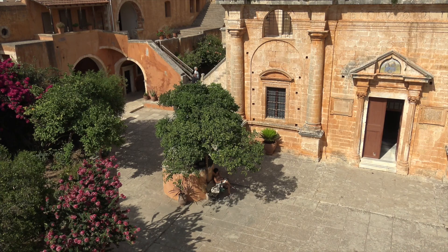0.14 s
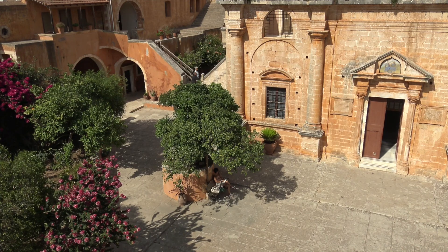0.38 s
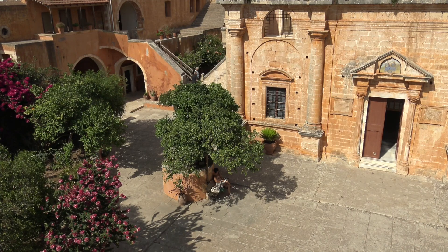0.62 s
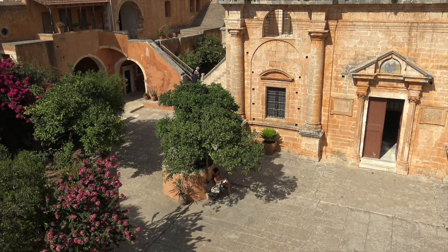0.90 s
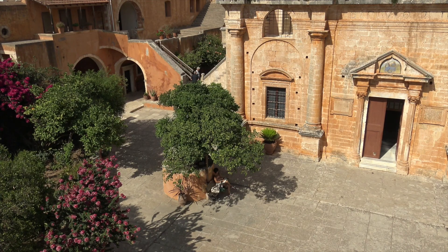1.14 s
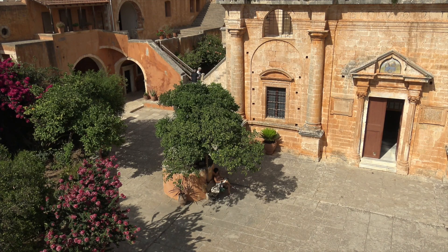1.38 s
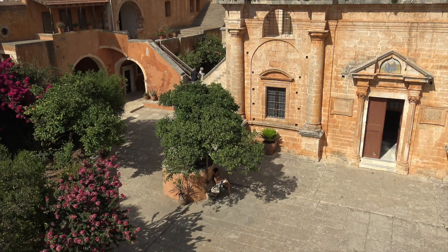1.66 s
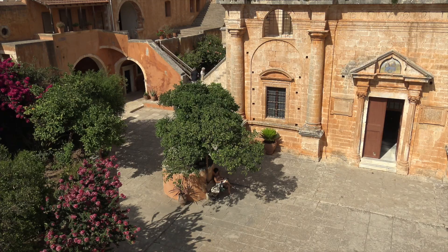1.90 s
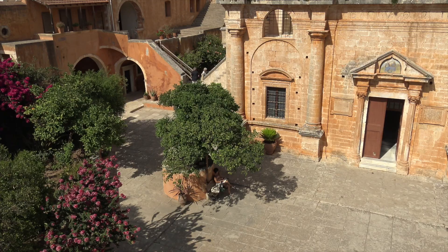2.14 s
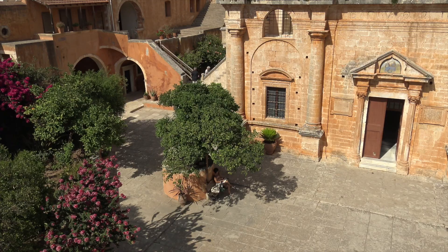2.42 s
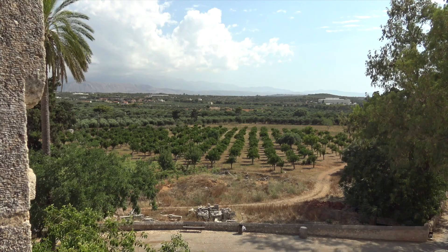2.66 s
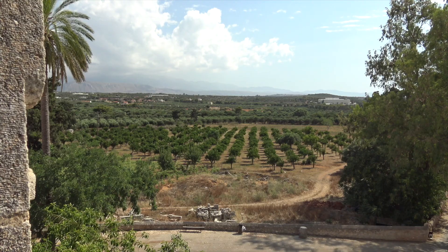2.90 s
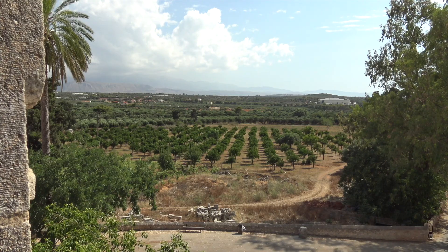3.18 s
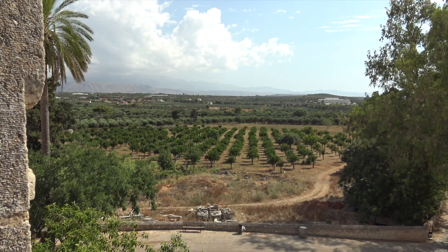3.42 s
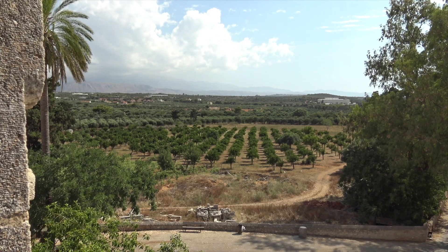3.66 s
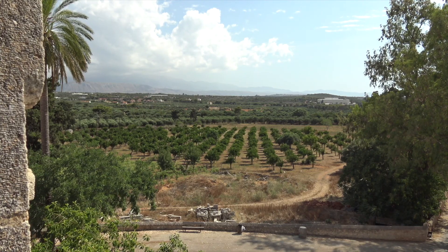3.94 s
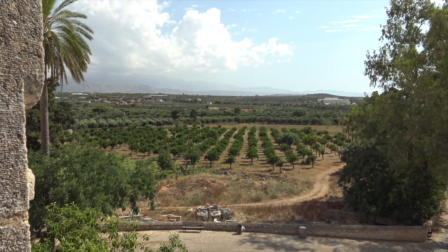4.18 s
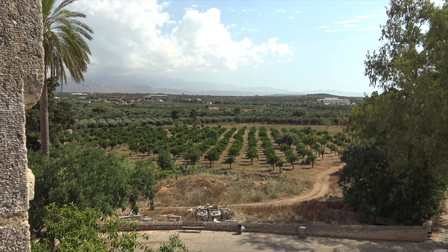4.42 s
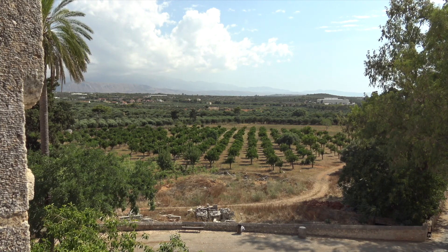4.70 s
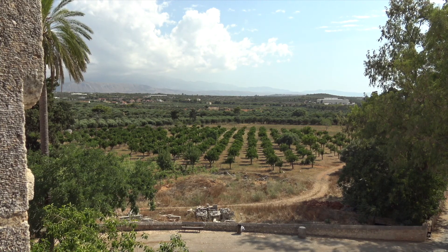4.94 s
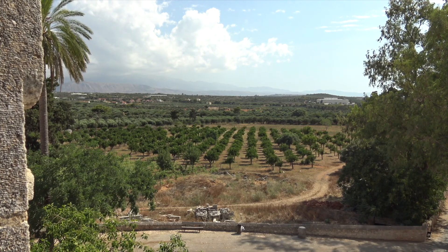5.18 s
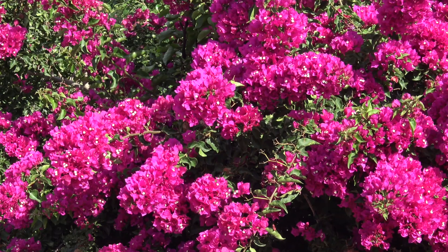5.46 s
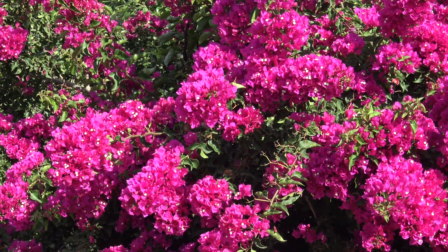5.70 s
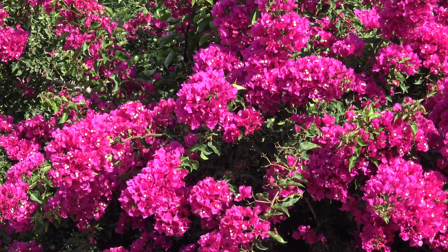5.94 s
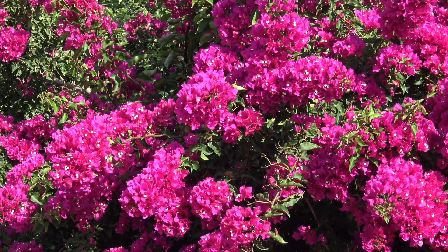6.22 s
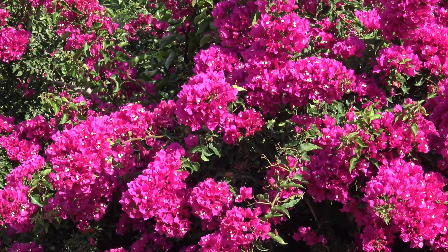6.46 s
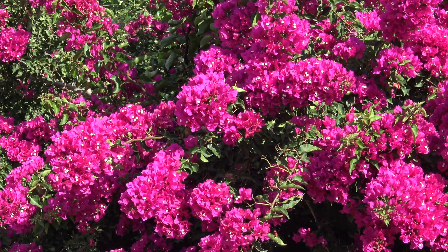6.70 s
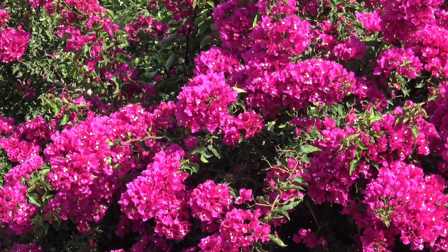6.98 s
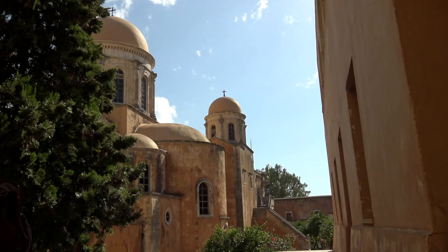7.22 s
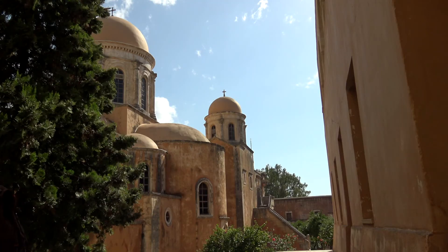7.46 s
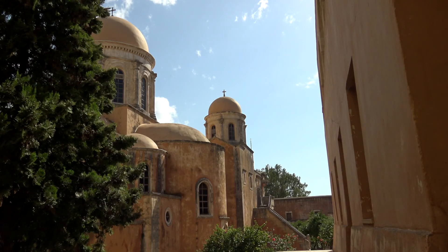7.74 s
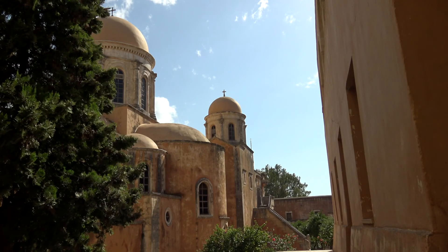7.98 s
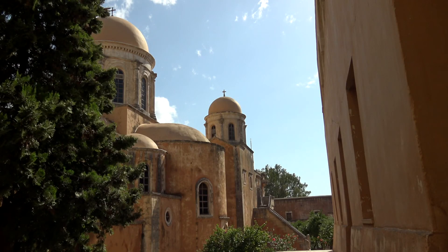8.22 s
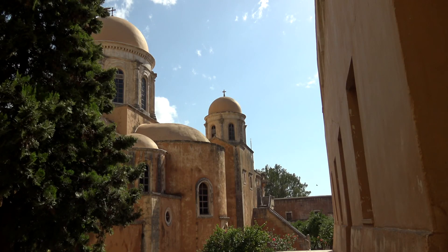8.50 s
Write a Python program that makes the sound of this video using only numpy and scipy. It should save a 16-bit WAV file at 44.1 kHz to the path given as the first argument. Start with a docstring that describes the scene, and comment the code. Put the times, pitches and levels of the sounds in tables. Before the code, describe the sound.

Cicadas buzz steadily all around a stone-walled garden while sparrows chirp brightly up close, with scratchy churrs and soft twitter echoing off the walls.

```python
"""A chorus of cicadas buzzes all round a garden among stone walls, one of them closer.
Sparrows chirp and churr, far birds whistle and coo, one dull knock falls; hum and air noise lie below.
Buckling membranes click and ring the cicadas' bodies; bird voices are gliding sines with an octave;
the walls are dying noise tails, the air is coloured noise, the hum is narrow resonances of noise."""
import sys
import numpy as np
from scipy import signal
from scipy.fft import rfft, irfft, next_fast_len
from scipy.io import wavfile

SR = 44100
rng = np.random.default_rng(int(sys.argv[2]) if len(sys.argv) > 2 else 0)


def to_wav(s):
    """Save 16-bit WAV."""
    ch = np.atleast_2d(s).T  # columns
    pcm = np.round(np.clip(ch, -1, 1) * 32767)  # PCM
    wavfile.write(sys.argv[1], SR, pcm.astype(np.int16))


def attenuation_scalar(level_db):
    """Turn a level in dB into a linear amplitude multiplier (20 dB per decade)."""
    decades = np.asarray(level_db, float) / 20
    return 10 ** decades


N = 379697   # length in samples


def rms_one(x):
    """Normalization: dividing by the root mean square gives unit power."""
    return x / np.sqrt(np.mean(x ** 2) + 1e-20)


def at_hz(points, hz):
    """Interpolation of a spectrum along a logarithmic frequency axis."""
    point_hz, value = np.transpose(points)
    return np.interp(np.log(hz), np.log(point_hz), value)


def drift(rate, size):
    """Random modulation: white noise through two equal one-pole low-passes at rate [Hz]; rms 1."""
    r = np.exp(-2 * np.pi * rate / SR)
    settle = SR // 2
    noise = rng.standard_normal(size + settle)
    return rms_one(signal.lfilter([1], [1, -2 * r, r * r], noise)[settle:])


def resonance(x, hz, width):
    """Damped resonator: a pole pair passes a band of the given width with gain 1 on top."""
    r = np.exp(-np.pi * width / SR)
    zeros = np.array([1, 0, -1]) * (1 - r * r) / 2
    poles = [1, -2 * r * np.cos(2 * np.pi * hz / SR), r * r]
    return signal.lfilter(zeros, poles, x)


def sides(pan_db):
    """Stereo by level difference: half of it raises the left gain, half lowers the right."""
    return attenuation_scalar(np.array([pan_db / 2, -pan_db / 2]))


def diffuse(pair, spectrum):
    """Diffuse field: unrelated mid and side signals set the likeness of the ears; mid rms 1."""
    # (frequency [Hz], left-right correlation)
    ear_likeness = [(30, 0.057), (100, 0.11), (500, 0.46), (1400, 0.4), (3000, 0.38), (6000, 0.37),
                    (9000, -0.12), (13000, -0.18)]
    # (frequency [Hz], left-right level difference [dB])
    ear_balance = [(30, 1), (80, -12), (200, -1.5), (500, -4.5), (1400, 0), (5000, -1), (13000, -0.5)]
    size = next_fast_len(N)
    hz = np.arange(size // 2 + 1) * SR / size + 1
    mid, side = rfft(pair, size) * attenuation_scalar(at_hz(spectrum, hz))
    alike = np.clip(at_hz(ear_likeness, hz), -1, 1)
    mid, side = mid * np.sqrt(1 + alike), side * np.sqrt(1 - alike)
    ears = np.array([mid + side, mid - side]) * sides(at_hz(ear_balance, hz))
    field = irfft(ears, size)[:, :N]
    return field / np.sqrt(np.mean(field.mean(0) ** 2))


def buckles(per_s, second_db, spread_db):
    """Snap-through buckling: a membrane clicks in and out each cycle, with random size and sign."""
    halves = np.floor(2 * np.cumsum(per_s) / SR + 2 * rng.random())
    at = np.flatnonzero(np.diff(halves))
    chance = rng.uniform(-1.05, 1, (len(at), 2))
    size_db = second_db * (halves[at] % 2) + spread_db * chance[:, 0]
    clicks = np.zeros(N)
    clicks[at] = attenuation_scalar(size_db) * np.sign(chance[:, 1])
    return clicks


def chorus(count, swell_db):
    """Incoherent superposition: many cicadas, each at its own rate, share one body colour."""
    # effort of the chorus: (time [s], level of the main buzz [dB])
    effort_curve = [(0.0, -34), (1.1, -34.5), (2.01, -33.5), (3.21, -34), (3.35, -35), (4.15, -34.5),
                    (4.7, -32.5), (4.91, -35), (5.28, -34), (6.06, -34.5), (6.81, -34), (8.61, -35)]
    # colour that the bodies give to the clicks: (frequency [Hz], relative level [dB])
    body_colour = [(1120, -132), (1900, -26.5), (2600, -7.5), (3360, -13.5), (3630, -13), (3780, -17),
                   (4300, -11), (4760, -1.5), (5270, 2), (6800, -11), (7790, -8.5), (9400, -21),
                   (13000, -26), (13700, -28), (14500, -32.5)]
    split_hz = 6700
    upper_mean_db, upper_follows = -38.5, 1   # at mean effort; share of the main buzz's swing
    s, main_db = np.transpose(effort_curve)
    upper_db = upper_mean_db + upper_follows * (main_db - main_db.mean())
    t, pair = np.arange(N) / SR, np.zeros((2, N))
    for k in range(count):
        clicks_per_s = rng.uniform(120, 240)   # click pairs a second
        swells_per_s, swell_start = rng.uniform(1.479, 9.0), rng.random()
        swell = attenuation_scalar(swell_db * np.sin(2 * np.pi * (swells_per_s * t + swell_start)))
        pair[k % 2] += buckles(np.full(N, clicks_per_s), -4.5, 2.0) * swell
    buzz = diffuse(pair, body_colour)
    main = signal.sosfiltfilt(signal.butter(4, split_hz, fs=SR, output="sos"), buzz)
    main_gain, upper_gain = attenuation_scalar(np.interp(t, s, main_db)), attenuation_scalar(np.interp(t, s, upper_db))
    return rms_one(main) * main_gain + rms_one(buzz - main) * upper_gain


def solo():
    """Modal excitation: the close cicada's nearly steady click pairs ring its body modes."""
    # (frequency [Hz], width of each of two passes [Hz], relative level [dB])
    body_modes = [(7675, 1300, -2.5), (5400, 310, 0), (10160, 1700, -11.5)]
    pairs_per_s, wander_per_s = 167, 1.5   # mean rate and rms wander
    clicks = buckles(pairs_per_s + wander_per_s * drift(3, N), -6, 3.0)
    body = 0
    for hz, width, db in body_modes:
        body = body + attenuation_scalar(db) * resonance(resonance(clicks, hz, width), hz, width)
    return rms_one(body) * attenuation_scalar(-46.5) * sides(2.2)[:, None]


def whistle(hz, wobble_hz, flutter_db, octave_db):
    """Frequency modulation: a syrinx sine wobbles and flutters fast, with its second harmonic."""
    phase = 2 * np.pi * np.cumsum(hz + wobble_hz * drift(245, len(hz))) / SR
    flutter = attenuation_scalar(flutter_db * drift(133, len(hz)))
    return flutter * (np.sin(phase) + attenuation_scalar(octave_db) * np.sin(2 * phase))


def notes(rows, flat, edge, wobble_hz, flutter_db, octave_db):
    """Pitch glide: each note bends through three pitches under a sine-power envelope.

    rows: (time [s], length [s], from [Hz], middle [Hz], to [Hz], level [dB], left-right [dB]);
    a higher flat squares the arch of pitch, a higher edge makes the ends of the note fainter."""
    out = np.zeros((2, N + SR))
    for s, length, from_hz, middle_hz, to_hz, peak_db, pan_db in rows:
        u = np.linspace(0, 1, int(length * SR))   # progress through the note
        bow = (middle_hz - (from_hz + to_hz) / 2) * (1 - abs(2 * u - 1) ** flat)
        glide = from_hz + (to_hz - from_hz) * u + bow
        voice = whistle(glide, wobble_hz, flutter_db, octave_db)
        envelope = attenuation_scalar(peak_db) * np.sin(np.pi * u) ** edge
        first = int(s * SR)
        out[:, first:first + len(u)] += sides(pan_db)[:, None] * envelope * voice
    return out[:, :N]


def arches():
    """Two sources in one syrinx: tall pitch arches on common feet, with held shoulder notes."""
    # nearest sparrow: (time [s], length [s], top [Hz], level [dB], envelope power: high = faint legs)
    tall_chirps = [(1.4, 0.062, 5600, -21.5, 0.28), (1.852, 0.055, 5600, -22, 0.25),
                   (2.431, 0.06, 5590, -21.5, .6), (4.708, 0.057, 5560, -18.5, 0.6),
                   (5.085, 0.078, 5560, -21.5, 0.96), (5.483, 0.068, 5570, -21.5, 1),
                   (5.901, 0.054, 5750, -26, 0.43), (7.316, 0.057, 5710, -23.5, 0.44)]
    # feet of every arch: (start [Hz], end [Hz])
    arch_feet = (4054, 3853)
    # other half of the syrinx, beside each leg:
    # (progress through the arch [0-1], length [s], pitch [Hz], level relative to the arch [dB])
    shoulder_notes = [(0.077, .016, 5560, -6), (0.751, 0.014, 5430, -12)]
    start_hz, end_hz = arch_feet
    tall, rows = np.zeros((2, N)), []
    for s, length, top_hz, db, crest in tall_chirps:
        arch = [(s, length, start_hz, top_hz, end_hz, db, 7.0)]
        tall += notes(arch, 3.3, crest, wobble_hz=120, flutter_db=1.0, octave_db=-22.5)
        for progress, held, hz, under_db in shoulder_notes:   # each sags 80 Hz in its middle
            rows.append((s + progress * length, held, hz, hz - 80, hz, db + under_db, 13.0))
    return tall + notes(rows, 2.5, 0.24, wobble_hz=50, flutter_db=1.0, octave_db=-20.0)


def chirps():
    """Glide contours: peeps arch, slurs fall at one rate, hooks sweep up and then drop."""
    # small arches: (time [s], length [s], top [Hz], level [dB], left-right [dB])
    peeps = [(0.042, 0.031, 4050, -39, 5), (1.962, 0.023, 4360, -34.5, 14), (2.058, 0.066, 6050, -39, 11),
             (2.41, 0.03, 4560, -36, 16), (3.045, 0.022, 5900, -34, 4), (3.209, 0.055, 5970, -33, -6),
             (3.378, 0.038, 3950, -32, -3), (4.694, 0.02, 4200, -34, 4), (4.781, 0.015, 3980, -32.5, 4),
             (5.195, 0.04, 4270, -37, 7), (5.45, 0.044, 4320, -39, 11), (5.599, 0.035, 4440, -36, 17),
             (6, 0.046, 4520, -39, 10.5), (6.359, 0.049, 5770, -25, 7), (6.406, 0.049, 5950, -29.5, -4),
             (6.456, 0.03, 5600, -25, 10), (6.542, 0.033, 4460, -37, 11), (6.592, 0.024, 5400, -33, 15),
             (6.823, 0.0376, 5600, -27, 12), (6.934, 0.042, 5900, -36, 5), (6.98, 0.039, 5600, -26, 6),
             (7.056, 0.074, 4930, -39, 13), (7.37, 0.018, 4370, -34.5, 10.5), (7.426, 0.032, 4400, -41, 6),
             (7.458, 0.051, 5770, -34.5, 8), (7.501, 0.03, 5470, -33, 9), (7.569, 0.036, 4470, -37.5, 3),
             (7.666, 0.06, 3970, -40, -9), (8.581, 0.029, 5900, -32, 2)]
    # depth of the legs below the top, as a share of its pitch: (start [1], end [1])
    leg_shares = (0.1484, 0.124)
    # downward slurs: (time [s], length [s], from [Hz], level [dB], left-right [dB])
    slurs = [(1.532, 0.025, 5610, -26.5, 1), (1.726, 0.011, 4150, -38, 5), (2.991, 0.027, 5800, -30, 7),
             (3.27, 0.048, 5900, -38, -2), (4.201, 0.017, 5850, -27, 5), (5.272, 0.034, 5920, -33, 12),
             (6.528, 0.028, 6120, -36, 9), (6.898, 0.024, 5770, -23.5, 8), (7.415, 0.023, 5890, -26.5, 14)]
    # upward sweeps that hook down: (time [s], rise [s], top [Hz], level [dB], left-right [dB])
    hooks = [(0.292, 0.016, 3880, -30.5, 10), (1.6, 0.028, 3840, -33, -2), (1.765, 0.032, 4280, -34.5, 10),
             (2.897, 0.011, 3760, -32.5, -6), (4.287, 0.026, 3640, -37, -6), (5.725, 0.024, 4270, -45, 5),
             (6.031, 0.03, 4020, -34, 12), (7.146, 0.028, 3990, -32.5, 13), (7.962, 0.031, 4100, -36.5, 13)]
    fall_hz_per_s, bow_hz = 49000, 150   # slurs: slope, and height of the middle over a straight fall
    foot_hz, drop_hz, drop_s, drop_db = 3160, 850, 0.013, -7.5   # hooks; drop_db is relative to the rise
    rows = []
    for s, length, hz, db, pan in peeps:
        rows.append((s, length, hz * (1 - leg_shares[0]), hz, hz * (1 - leg_shares[1]), db, pan))
    for s, length, hz, db, pan in slurs:
        fall_hz = fall_hz_per_s * length
        rows.append((s, length, hz, hz - fall_hz / 2 + bow_hz, hz - fall_hz, db, pan))
    for s, rise_s, hz, db, pan in hooks:
        rows.append((s, rise_s, foot_hz, (foot_hz + hz) / 2, hz, db, pan))
        rows.append((s + rise_s, drop_s, hz, hz - drop_hz / 3, hz - drop_hz, db + drop_db, pan))
    return notes(rows, 2.63, 0.14, wobble_hz=50.3, flutter_db=1.0, octave_db=-24.0)


def beak(x):
    """Vocal-tract filtering: a beak resonance lifts the crest of a slide, with a dip below it."""
    # (frequency [Hz], width [Hz], added share [1])
    beak_bands = [(5600, 330, 0.04), (4890, 1000, -0.097)]
    return x + sum(share * resonance(x, hz, width) for hz, width, share in beak_bands)


def warbler():
    """Repetition of a motif: a sparrow by the wall sings one phrase with changing emphasis."""
    # each singing: (time of the low rise [s], level of the first two notes [dB], of the rest [dB])
    singings = [(.174, -31, -32.5), (.569, -31, -31.5), (1.547, -30, -31.5), (2.232, -29.5, -34.5),
                (4.151, -34, -38), (7.754, -30.5, -32.5)]
    # (time from the low rise [s], length [s], from [Hz], middle [Hz], to [Hz], relative level [dB])
    phrase_notes = [(-.059, .018, 3720, 4120, 4800, -0.5), (-.046, 0.033, 3964, 3450, 3950, -4),
                    (-.002, .028, 3550, 3800, 3750, -3.5), (0.0, .023, 3050, 3160, 3720, -0.5),
                    (.022, .014, 3750, 3150, 2980, 0.5), (.038, .018, 3050, 3200, 3050, -6.5)]
    rows = []
    for s, opening_db, closing_db in singings:
        for k, (delay, length, *hz, db) in enumerate(phrase_notes):
            part_db = opening_db if k < 2 else closing_db
            rows.append((s + delay, length, *hz, db + part_db, -.8))
    return notes(rows, 1.88, 0.13, wobble_hz=41, flutter_db=2.0, octave_db=-30)


def churrs(trill_per_s, trill_hz):
    """Biphonation: both halves of the syrinx sing at once, hoarse, in quick falling strokes."""
    # (time [s], length [s], low voice level [dB], high voice level [dB]), before the course below
    churr_calls = [(0.729, 0.16, -31, -37), (2.489, 0.16, -29.5, -33.5), (4.408, 0.16, -31, -36),
                   (6.79, 0.16, -30, -35), (8.048, 0.15, -29.5, -33.5)]
    # both voices sink and the head turns: (progress [0-1], low pitch [Hz], high pitch [Hz],
    # low relative level [dB], high relative level [dB], left-right [dB])
    churr_course = [(0, 3450, 4300, -5, -8, 6), (.17, 3490, 4300, -15.5, -0.5, 12),
                    (0.418, 3386, 4100, -3, -7, 7.5), (.68, 3240, 3900, -0.5, -12, 4.5),
                    (1, 2920, 3690, -2.5, 0, 5)]
    out = np.zeros((2, N))
    progress, low_fall, high_fall, *shape_db = np.transpose(churr_course)
    for s, length, low_top_db, high_top_db in churr_calls:
        at = np.arange(int(s * SR), int((s + length) * SR))
        u = np.linspace(0, 1, len(at))
        low_db, high_db, pan_db = [np.interp(u, progress, column) for column in shape_db]
        stroke = (trill_per_s * at / SR + .3 * drift(30, len(at))) % 1   # phase, with uneven timing
        trill, swell = trill_hz * (1 - 2 * stroke), 2.8 + np.sin(np.pi * stroke)
        low_hz = np.interp(u, progress, low_fall) + trill
        high_hz = np.interp(u, progress, high_fall) + trill
        low = rms_one(swell * whistle(low_hz, 88, 2.5, -28))
        high = rms_one(swell * whistle(high_hz, 91.0, 1.6, -30))
        voices = attenuation_scalar(low_top_db + low_db) * low + attenuation_scalar(high_top_db + high_db) * high
        out[:, at] += sides(pan_db) * voices * signal.windows.tukey(len(at), .15)
    return out


def thump():
    """Damped oscillation: a soft contact makes one low mode ring for about a cycle."""
    # (starting level [dB], frequency [Hz], 60 dB decay time [s], left-right [dB])
    knock_mode = (-22, 290, .009, -9)
    knock_s = 4.6328
    start_db, hz, t60, pan_db = knock_mode
    t = np.maximum(np.arange(N) / SR - knock_s, 0)
    decay = attenuation_scalar(start_db - 60 * np.minimum(t / t60, 4))
    return sides(pan_db)[:, None] * decay * np.sin(2 * np.pi * hz * t)


def flock(count):
    """Statistical texture: short glides at random pitches and moments merge into twitter."""
    # (time [s], rms level ahead of the walls [dB])
    flock_curve = [(0.0, -49), (0.2, -41), (0.401, -58), (0.789, -36), (1.2, -63), (1.558, -48.5),
                   (3.4, -48.5), (3.93, -62), (4.2, -38.5), (4.45, -58), (4.65, -39), (4.84, -50.5),
                   (5.56, -49.5), (5.71, -63), (5.92, -46.5), (6.75, -54), (7.1, -43.5), (7.701, -53.5),
                   (8.15, -38), (8.32, -62), (8.61, -55)]
    draw = rng.random((count, 4))
    hz = 3000 + 1500 * draw[:, 1:]
    rows = np.column_stack([draw[:, 0] * N / SR, np.full(count, .03), hz, np.zeros((count, 2))])
    s, flock_db = np.transpose(flock_curve)
    twitter = notes(rows, 1.894, 1.0, wobble_hz=57.6, flutter_db=2.5, octave_db=-40)
    return rms_one(twitter) * attenuation_scalar(np.interp(np.arange(N) / SR, s, flock_db))


def walls(x):
    """Reverberation: walls and paving scatter sound into a decaying tail, another for each ear."""
    t60_s, first_echo_s = 0.55, 0.0046
    near_t60_s, near_db = 0.044, -1.5   # the nearest wall's short tail, relative to the long one
    t = np.arange(SR // 2) / SR
    decay = attenuation_scalar(-60 * t / t60_s) + attenuation_scalar(near_db - 60 * t / near_t60_s)
    tail = rng.standard_normal((2, len(t))) * decay * (t > first_echo_s)
    tail /= np.sqrt(np.sum(tail ** 2, axis=1, keepdims=True))   # unit energy
    return signal.fftconvolve(x.mean(0, keepdims=True), tail, axes=1)[:, :N]


def far_birds():
    """Nearly pure tones: long faint whistles ahead, and far coos each on one pitch."""
    # (time [s], length [s], from [Hz], to [Hz], level [dB])
    far_whistles = [(0.081, 0.26, 1610, 1535, -63), (.3, 0.25, 1530, 1465, -65),
                    (1.047, 0.55, 1596, 1620, -64.5), (2.053, 0.345, 1564, 1626, -63.5),
                    (2.35, 0.23, 1484, 1525, -62.5)]
    # (time [s], length [s], pitch [Hz], level [dB], left-right [dB])
    far_coos = [(0.719, 0.32, 445.5, -58.5, -4.5), (1.48, 0.27, 194.4, -55.5, -19),
                (2.038, 0.17, 544, -59.5, -12), (2.5, 0.14, 544, -61.5, -10), (4.363, 0.185, 538, -61.5, 7),
                (5.65, 0.15, 539, -58, 0.0)]
    rows = []
    for s, length, from_hz, to_hz, db in far_whistles:
        rows.append((s, length, from_hz, (from_hz + to_hz) / 2, to_hz, db, .8))
    for s, length, hz, db, pan in far_coos:
        rows.append((s, length, hz, hz, hz, db, pan))
    return notes(rows, 2.3, 0.31, wobble_hz=11.3, flutter_db=5.5, octave_db=-26)


def background():
    """Filtered noise: air and far traffic swell, with a wavering hum stronger on the right."""
    # (frequency [Hz], relative level [dB])
    air_colour = [(7.1, -4.5), (12, 4), (38, -14), (65, -10.5), (81, -20), (118, -12), (144, -15.5),
                  (188, -16.5), (1440, -31), (2400, -38), (3120, -63), (5280, -120)]
    # swell, taken about its mean: (time [s], level [dB])
    air_swell = [(0.0, -53.5), (1.89, -52), (2.83, -53.5), (3.81, -52.5), (7.89, -53.5), (8.61, -53.5)]
    # (frequency [Hz], width [Hz], rms level before panning [dB])
    hum_bands = [(60.3, 3.1, -55.5), (118, 4.5, -60.5), (197.2, 10.3, -63)]
    air_db = -47   # mid rms before the swell
    s, course_db = np.transpose(air_swell)
    swell_db = np.interp(np.arange(N) / SR, s, course_db - course_db.mean())
    air = attenuation_scalar(air_db + swell_db) * diffuse(rng.standard_normal((2, N)), air_colour)
    hum = np.zeros(N)
    for hz, width, db in hum_bands:
        hum += attenuation_scalar(db) * rms_one(resonance(rng.standard_normal(N), hz, width))
    return air + hum * sides(-12.0)[:, None]


def scene():
    """Superposition: direct sounds add to their wall echoes; the flock is heard by echo alone."""
    insects = chorus(count=90, swell_db=5.0)
    close = solo()
    near = beak(arches() + chirps())
    warbles = warbler()
    harsh = churrs(85, 345)
    to_walls = attenuation_scalar(-2.5) * near + attenuation_scalar(-1.0) * warbles + attenuation_scalar(1.5) * harsh
    to_walls = to_walls + attenuation_scalar(2.5) * close + attenuation_scalar(3.5) * flock(count=500)
    birds = near + warbles + harsh + far_birds()
    return insects + close + birds + thump() + walls(to_walls) + background()


def band_limit(x):
    """A steep low-pass at the top of the band."""
    return signal.sosfilt(signal.butter(12, 15870, fs=SR, output="sos"), x)


def record(dry):
    """The last stage of the signal chain, applied to the finished mix."""
    return band_limit(dry)


dry = scene()
out = record(dry)
to_wav(out)
```